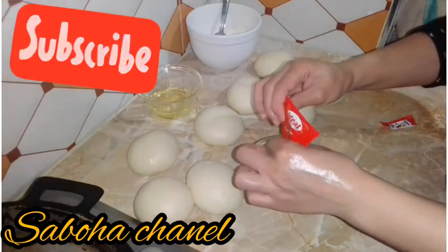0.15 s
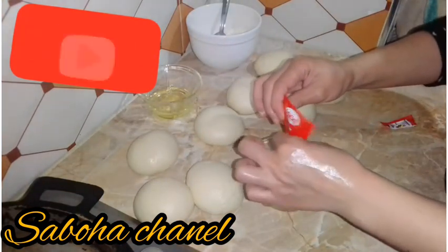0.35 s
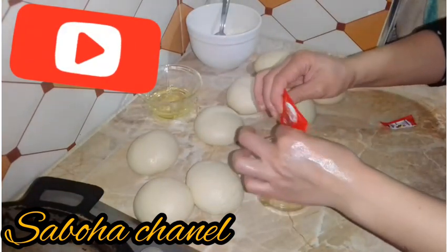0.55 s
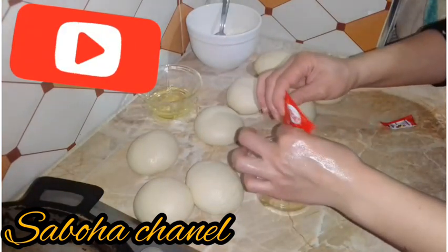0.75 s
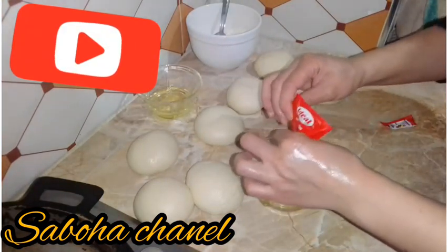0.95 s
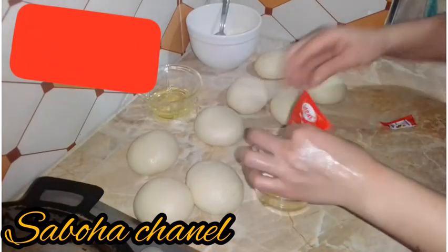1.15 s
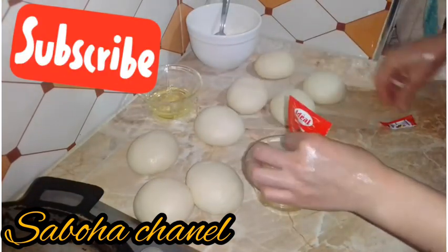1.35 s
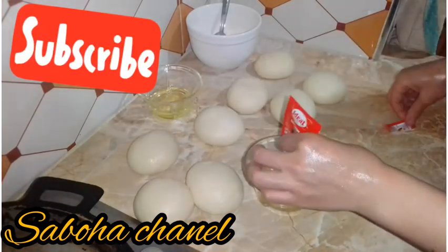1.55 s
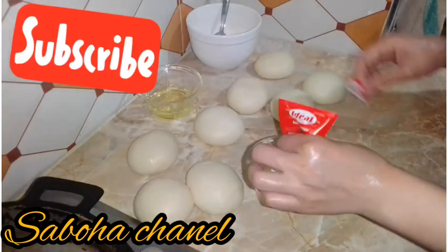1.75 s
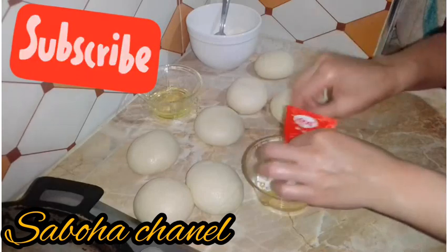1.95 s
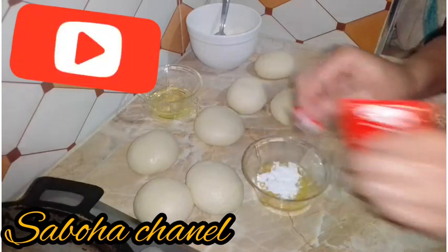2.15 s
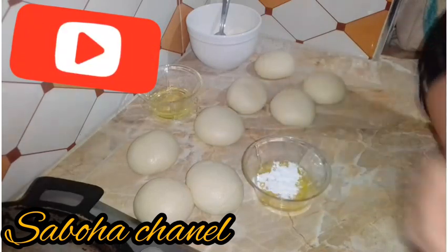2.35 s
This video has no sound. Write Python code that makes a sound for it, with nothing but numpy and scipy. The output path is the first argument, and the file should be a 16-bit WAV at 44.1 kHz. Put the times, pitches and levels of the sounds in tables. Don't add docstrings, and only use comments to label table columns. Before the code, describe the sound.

A small paper sachet rustles close to a phone microphone in a tiled kitchen: faint start, quick bursts of dense crackle and sharp snaps, strongest before one second, then lighter, crisper crinkles over quiet room hum.

```python
import sys
import numpy as np
from scipy import signal
from scipy.fft import rfft, irfft
from scipy.io import wavfile
from scipy.ndimage import uniform_filter1d

SR = 44100
rng = np.random.default_rng(int(sys.argv[2]) if len(sys.argv) > 2 else 0)


def inscribe(sig):
    pcm = np.round(np.clip(np.atleast_2d(sig).T, -1, 1) * 32767)
    wavfile.write(sys.argv[1], SR, pcm.astype(np.int16))


def magnitude_from_level(level_db):
    exponent = np.asarray(level_db, float) / 20
    return 10 ** exponent


N = 105840

# start [s], swell [s], fade [s], peak level [dB], extra crispness [dB].
SHAKES = [(-.03, 0.025, 0.035, -59, 0.5), (0.179, 0.019, 0.027, -54.5, 7), (0.216, 0.02, 0.21, -48.5, 4.5),
          (0.363, 0.01, 0.071, -48, 15.5), (0.423, 0.0038, 0.031, -50.5, 6),
          (0.456, 0.044, 0.078, -44.5, 6), (0.499, 0.021, 0.12, -46.5, -13), (0.617, 0.032, 0.1, -39, 4.5),
          (0.724, 0.05, 0.077, -36, 2), (0.861, 0.033, 0.065, -35, 5.5), (.955, .012, 0.16, -44.5, 0),
          (.995, 0.031, 0.072, -37, 1), (1.149, 0.036, 0.047, -43.5, 8.5), (1.254, 0.027, 0.062, -48, 9),
          (1.33, 0.03, 0.088, -51, 5.5), (1.425, 0.034, 0.078, -57.5, 12.5), (1.724, 0.053, 0.13, -48, 9),
          (1.798, 0.007, 0.073, -42.5, 13), (1.922, 0.022, 0.092, -46, 10), (1.949, 0.024, 0.014, -49, 10),
          (2.044, 0.026, 0.15, -51, 10), (2.106, 0.019, 0.06, -46.5, 5), (2.227, 0.03, 0.098, -59.5, 9.5)]
# frequency [Hz], level [dB].
PAPER = [(600, -11.5), (1100, -7), (1450, -13), (2500, -10), (4500, -3), (5500, -5.5), (7000, -13),
         (9000, -43.5)]
# frequency [Hz], level [dB].
CRISP = [(5000, -25.5), (7500, -15.5), (10000, -24.5), (12400, -15.5), (14300, -5), (15700, -12)]


def unit(x):
    return x / np.sqrt(np.mean(x ** 2))


def colour(x, points):
    hz, db = np.array(points, float).T
    f = np.maximum(np.arange(2049) * SR / 4096, 1)
    level_db = np.interp(np.log(f), np.log(hz), db, left=db[0] - 1.5)
    cepstrum = irfft(level_db * np.log(10) / 20)
    cepstrum[1:2048] *= 2
    cepstrum[2049:] = 0
    impulse = irfft(np.exp(rfft(cepstrum)))
    return signal.fftconvolve(x, impulse)[:len(x)]


def ring(x, hz, width_hz):
    b, a = signal.iirpeak(hz, hz / max(width_hz, 5), fs=SR)
    return signal.lfilter(b, a, x)


def walk(rate):
    k = int(SR / rate)
    held = np.repeat(rng.standard_normal(N // k + 1), k)
    return 1.3 * uniform_filter1d(uniform_filter1d(held, k), k)[:N]


def effort(t):
    start_drop_db, slow_start_db_per_s = -5, -200
    hold_drop_db, fade_drop_db = -14, -40
    onset_s = 0.0015
    body, crisp = np.zeros(N), np.zeros(N)
    for start, swell, fade, db, crisp_db in SHAKES:
        times = [0, swell, swell + fade / 2, swell + fade, swell + 2 * fade]
        levels = [start_drop_db + slow_start_db_per_s * swell, 0, hold_drop_db, fade_drop_db, 3 * fade_drop_db]
        strength = magnitude_from_level(db + np.interp(t - start, times, levels))
        power = strength ** 2 * np.clip((t - start) / onset_s, 0, 1) ** 2
        body = body + power
        crisp = crisp + power * magnitude_from_level(2 * crisp_db)
    return np.sqrt(body), np.sqrt(crisp)


def young(t):
    late_s = 0.028
    ages = [(t - s[0], t > s[0]) for s in SHAKES]
    return np.max([np.exp(-np.maximum(age, 0) / late_s) * begun for age, begun in ages], axis=0)


def ticks():
    ticks_per_s, scatter_db = 1600, 3.5
    chance = rng.random(N)
    size = np.minimum(rng.exponential(size=N), 4)
    hiss = rng.standard_normal(N)
    grains = (chance < ticks_per_s / SR) * magnitude_from_level(scatter_db * size) * np.sign(hiss)
    flicker_db = 1.5 * walk(150)
    clump_db = 1.8 * walk(59.9)
    return unit(grains + 0.13 * hiss) * magnitude_from_level(flicker_db + clump_db)


def creases(shared, crisp_db, fresh):
    width, shared_db, drift_db = 0.38, -3.5, 2.5
    small_per_octave = 0.37
    large_late_db = -3
    total = 0
    for hz in 600 * 2 ** np.arange(0, 4.1, .4):
        level_db = drift_db * walk(19.97) + small_per_octave * crisp_db * np.log2(hz / 4000)
        level_db = level_db + large_late_db * fresh * max(np.log2(5000 / hz), 0)
        source = magnitude_from_level(shared_db) * shared + ticks()
        total = total + magnitude_from_level(level_db) / np.sqrt(hz) * ring(source, hz, width * hz)
    return total


def pocket(x, peaks):
    drift_db = 2
    total = 0
    for k, (hz, width_hz, db) in enumerate(peaks):
        mode = ring(x * magnitude_from_level(drift_db * walk(12.02)), hz, width_hz)
        total = total + (-1) ** k * magnitude_from_level(db) * mode * np.sqrt(60 / width_hz)
    return total


def pocket_modes(push, t):
    # centre [Hz], width [Hz], level [dB].
    full_peaks = [(1039, 26, -11.5), (1767, 39, -3.5), (2080, 21, -6.5), (2434, 46, -5), (2820, 38, 0),
                  (3480, 80, 4.5), (3736, 260, 3), (4160, 39, -3), (4590, 78, 2), (5010, 33, 1),
                  (5100, 77, -0.5)]
    empty_peaks = [(1570, 52, -3), (2086, 41, -0.5), (2820, 94, -0.5), (3050, 39, -10), (3605, 83, 1),
                   (3820, 30, 4.5), (4520, 58, -10.5), (4700, 51.5, -13), (4980, 100, -3),
                   (5760, 38, -11.5), (6650, 130, -14.5)]
    flat_peaks = [(1615, 140, -13), (2550, 78, -5), (3080, 70, -7.5), (3490, 93, 1), (4590, 74, -11.5),
                  (5260, 140, -17), (6300, 140, -10)]
    emptied_s, flattened_s, flat_db = 1.13, 1.65, -0.5
    full = np.clip((emptied_s - t) / 0.014, 0, 1)
    modes = pocket(push * full, full_peaks)
    modes = modes + pocket(push * (1 - full) * (t < flattened_s), empty_peaks)
    return modes + magnitude_from_level(flat_db) * pocket(push * (t > flattened_s), flat_peaks)


def finger_rub(t, body):
    # time [s], level [dB].
    grip = [(0.0, -63.5), (0.15, -77), (0.21, -53.5), (0.45, -59), (0.57, -48.5), (0.61, -62.5),
            (0.66, -54.5), (0.69, -58.5), (0.77, -51), (0.83, -56.5), (1.06, -54.5), (1.09, -59),
            (1.38, -59.5), (1.4, -64), (1.71, -71), (1.74, -64), (2.11, -58.5), (2.4, -74.5)]
    # frequency [Hz], level [dB].
    rub = [(185, -29), (240, -5), (350, 4.5), (520, 1), (750, -8), (1200, -21)]
    rub_db, follow, smooth_s = 0.5, 0.28, 0.0067
    slow = uniform_filter1d(body, int(smooth_s * SR)) + 1e-4
    pressure = magnitude_from_level(np.interp(t, *np.array(grip).T))
    moving = (slow / uniform_filter1d(slow, SR // 5)) ** follow * pressure
    skin = rng.standard_normal(N) * magnitude_from_level(2 * walk(39.35))
    return magnitude_from_level(rub_db) * moving * unit(colour(skin, rub))


def rustle(t, body, crisp):
    sheet_db, pocket_db, treble_db = -3, 0.5, -13
    x = ticks()
    push = x * body
    level = magnitude_from_level(sheet_db) * np.std(push)
    modes = pocket_modes(push, t)
    crisp_db = 20 * np.log10((crisp + 1e-9) / (body + 1e-9))
    sheet = unit(colour(creases(x, crisp_db, young(t)) * body, PAPER)) * level
    sheet = sheet + magnitude_from_level(pocket_db) * unit(modes) * level
    fine = (x + 0.75 * rng.standard_normal(N)) * crisp
    treble = magnitude_from_level(treble_db) * unit(colour(fine, CRISP)) * np.std(x * crisp)
    return sheet + treble + finger_rub(t, body)


def snaps():
    # time [s], peak level [dB], ringing pitch [Hz], t60 [s].
    folds = [(0.191, -31, 3700, 0.027), (0.302, -21.5, 2820, 0.065), (0.366, -30.5, 2820, 0.071),
             (0.4283, -33, 3900, 0.11), (0.4789, -25.5, 3520, 0.15), (0.548, -26, 3580, 0.033),
             (0.6414, -34, 3740, 0.1), (0.657, -20.5, 3840, 0.12), (0.782, -37, 4520, 0.038),
             (0.8425, -38.5, 4360, 0.24), (0.8711, -24, 2080, 0.15), (0.8887, -23, 4640, 0.028),
             (0.956, -31, 3800, 0.065), (1.0152, -24, 4520, 0.022), (1.2999, -27.5, 3860, 0.13),
             (1.3646, -33.5, 4590, 0.049), (1.4306, -42, 1650, 0.11), (1.4586, -32, 2120, 0.051),
             (1.5964, -39.5, 3480, 0.088), (1.7755, -39.5, 1630, 0.21), (1.8026, -29, 4940, 0.05),
             (1.933, -41, 4540, 0.058), (2.111, -32, 2930, 0.072), (0.2357, -34, 3460, .05),
             (0.375, -44, 2820, 0.075), (0.4617, -33.5, 3490, .06), (0.486, -33, 3500, 0.028),
             (0.6293, -39.5, 2820, 0.091), (0.731, -27, 3820, 0.11), (0.737, -29, 4870, 0.097),
             (0.7847, -39, 3500, 0.025), (0.918, -30, 4500, 0.053), (1.027, -32.5, 4500, 0.045),
             (1.1626, -30.5, 3640, 0.14), (1.2733, -44, 2810, 0.069), (1.7333, -40, 4650, 0.12),
             (1.9696, -30, 4590, 0.085), (2.0532, -35.5, 4540, .05), (2.124, -37, 3100, 0.043),
             (1.553, -53, 3260, 0.15), (1.1975, -25.5, 5140, 0.058), (0.762, -40, 3480, 0.019),
             (.224, -47, 4400, 0.046), (1.815, -31.5, 3360, 0.046)]
    snap_db, crack_db, tail_db, tone_db = -8.5, -3.5, -3, -8.5
    width, lowest = .2, 0.69
    crack_s = 0.00057
    out, t = np.zeros(N + SR), np.arange(SR // 5) / SR
    for s, db, hz, t60 in folds:
        ring_noise, rough = rng.standard_normal((2, len(t)))
        fall = magnitude_from_level(-60 * t / max(t60, .005))
        tone = unit(ring(ring_noise, hz, width * hz)) * fall * magnitude_from_level(tone_db)
        crack = magnitude_from_level(crack_db) * np.sign(rough) * np.exp(-t / crack_s)
        burst = colour(crack + magnitude_from_level(tail_db) * rough * fall, PAPER + CRISP[2:])
        no_bass = signal.butter(3, lowest * hz, "highpass", fs=SR, output="sos")
        burst = signal.sosfilt(no_bass, burst)
        i = int(s * SR)
        out[i:i + len(t)] += magnitude_from_level(db + snap_db) * (tone + burst)
    return out[:N]


def rings():
    # start [s], level [dB], pitch [Hz], t60 [s].
    panels = [(0.18, -47.5, 365, 0.19), (.275, -43, 525, .15), (0.47, -49.5, 527, 0.27),
              (0.57, -52, 450, 0.11), (0.61, -58.5, 384, 0.84), (0.72, -48, 352, 0.27),
              (.235, -48.5, 3300, 0.35), (0.34, -49, 3200, 0.058), (0.51, -39.5, 2820, 0.12),
              (.862, -41, 2080, 0.069), (1.16, -49, 2090, 0.066), (1.15, -56.5, 3680, 0.45),
              (1.29, -50.5, 1690, 0.17), (1.87, -49, 1686, 0.17), (1.97, -47, 1500, 0.064),
              (1.87, -55, 4520, 0.4), (2.115, -45, 3120, 0.075), (2.1, -44.5, 1670, 0.049),
              (0.24, -56, 390, 0.13), (.29, -51, 334, 0.2), (.425, -57, 650, 0.081), (.435, -55, 410, 0.18),
              (0.49, -58.5, 380, .12), (.56, -48.5, 393, .12), (0.81, -37.5, 370, 0.081),
              (0.61, -46, 2820, 0.25), (.73, -44.5, 3300, 0.2), (1.06, -62, 3600, 0.12),
              (1.965, -48, 9300, .08), (2.035, -58, 4550, 0.27), (2.1, -55, 2100, 0.21),
              (2.16, -56, 510, 0.11), (1.36, -52, 440, 0.049), (0.82, -50, 820, 0.11),
              (1, -53.5, 380, 0.11), (.955, -44.5, 4300, 0.38), (1.83, -51, 3300, 0.097),
              (1, -44, 2900, 0.12), (0.42, -40, 3900, 0.36), (.49, -51.5, 1035, 0.58),
              (.52, -46, 3300, 0.29), (1, -45, 1700, .12), (0.21, -54, 1000, 0.1)]
    wander, rough_db, swell_cycles = .022, 3, 5
    out, t = np.zeros(N + SR), np.arange(SR // 4) / SR
    for s, db, hz, t60 in panels:
        noises = rng.standard_normal((2, len(t)))
        pitch, size = (unit(uniform_filter1d(n, int(4 * SR / hz))) for n in noises)
        phase = 2 * np.pi * np.cumsum(hz * (1 + wander * pitch)) / SR
        tone = magnitude_from_level(rough_db * size) * np.sin(phase)
        swell = np.minimum(t * hz / swell_cycles, 1)
        i = int(s * SR)
        out[i:i + len(t)] += magnitude_from_level(db - 60 * t / max(t60, .01)) * swell * tone
    return out[:N]


def sag(t):
    start_s, length_s, level_db, flicker_db = .24, 0.209, -58.5, 2
    from_hz, to_hz = 325, 229.6
    u = np.clip((t - start_s) / length_s, 0, 1)
    hz = from_hz * (to_hz / from_hz) ** u * (1 + 0.026 * walk(36.7))
    swell = np.sqrt(np.sin(np.pi * u) + 1e-9) * (u > 0) * (u < 1)
    tone = np.sin(2 * np.pi * np.cumsum(hz) / SR)
    return magnitude_from_level(level_db + flicker_db * walk(29.7)) * swell * tone


def tiled_walls(near):
    room_db, t60_s = -8.5, 0.17
    u = np.arange(SR // 2) / SR
    tiles = rng.standard_normal(len(u)) * magnitude_from_level(-60 * u / t60_s) * (u > .004)
    return magnitude_from_level(room_db) * signal.fftconvolve(near, tiles / np.linalg.norm(tiles))[:N]


def kitchen(body):
    # frequency [Hz], density [dB per Hz].
    hum = [(30, -9), (110, -12), (160, -24), (250, -1.5), (520, -16), (900, -22), (1800, -24.5),
           (9500, -26.5), (14500, -14)]
    level_db, duck_db, duck_s, knee_db = -65, -4, 0.069, -62
    busy = uniform_filter1d(body, int(duck_s * SR))
    duck = duck_db * magnitude_from_level(knee_db) / (magnitude_from_level(knee_db) + busy)
    level = magnitude_from_level(level_db + duck + 1.23 * walk(5.7))
    return level * unit(colour(rng.standard_normal(N), hum))


def scene():
    t = np.arange(N) / SR
    body, crisp = effort(t)
    near = rustle(t, body, crisp) + snaps() + rings() + sag(t)
    bass_cut = signal.butter(4, 187, "highpass", fs=SR, output="sos")
    near = signal.sosfilt(bass_cut, near)
    mid = near + tiled_walls(near) + kitchen(body)
    return np.array([mid, mid])


def treble_patches(mid):
    side_db, side_share = -3.5, .55
    side = 0
    for hz in (7500, 8500, 9500, 10500, 11500, 12500):
        band = signal.butter(4, [hz - 480, hz + 480], "bandpass", fs=SR, output="sos")
        size = np.sqrt(uniform_filter1d(signal.sosfilt(band, mid) ** 2, 1000) + 1e-18)
        share = side_share * (1.3 - (abs(hz - 10000) / 2300) ** 2)
        patches = np.repeat(rng.random(N // 2048 + 1) < share, 2048)[:N] * 1.
        on = uniform_filter1d(patches, 300)
        grain = unit(signal.sosfilt(band, rng.standard_normal(N)))
        side = side + magnitude_from_level(side_db) * size * on * grain
    return side


def band_limit(x):
    return signal.sosfilt(signal.butter(12, 16060, fs=SR, output="sos"), x)


def record(dry):
    side = treble_patches(dry[0])
    top_cut = signal.ellip(8, .2, 60, 15760, fs=SR, output="sos")
    rumble_cut = signal.butter(2, 15, "highpass", fs=SR, output="sos")
    stereo = dry + side * np.array([[1], [-1]])
    mix = signal.sosfilt(np.vstack([top_cut, rumble_cut]), stereo)
    return band_limit(mix)


dry = scene()
out = record(dry)
inscribe(out)
```